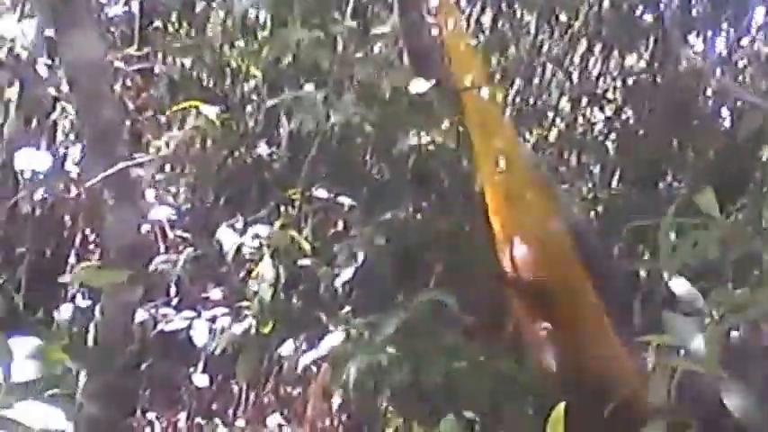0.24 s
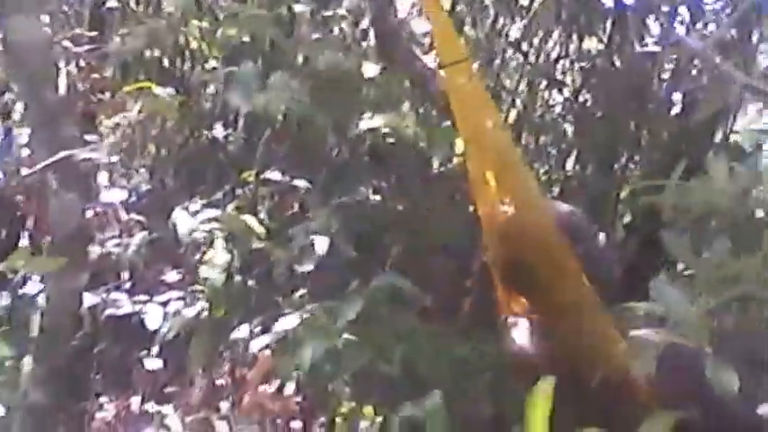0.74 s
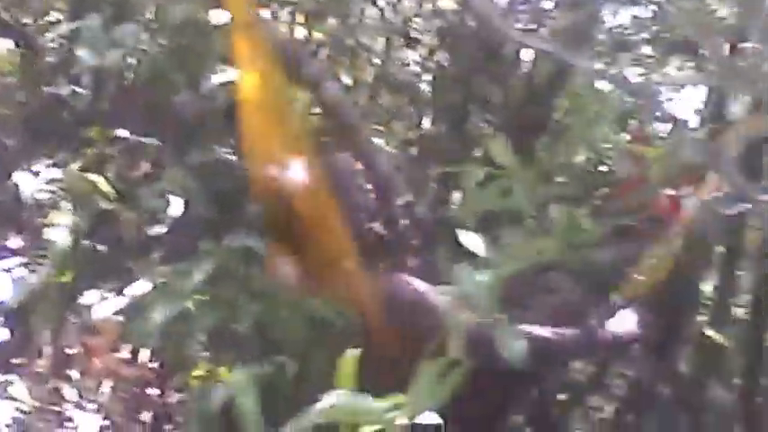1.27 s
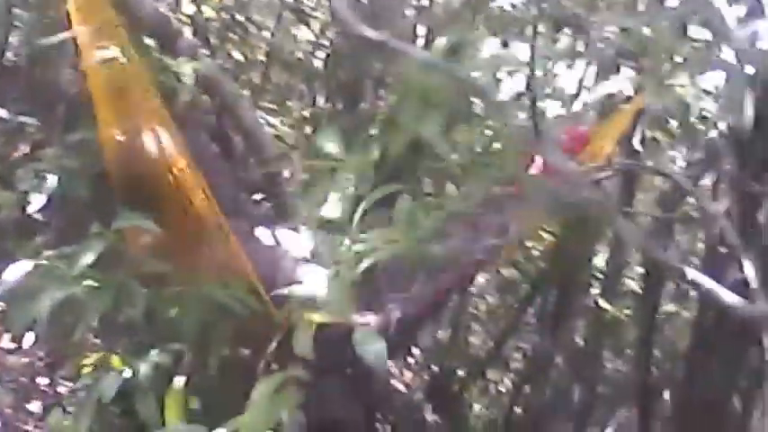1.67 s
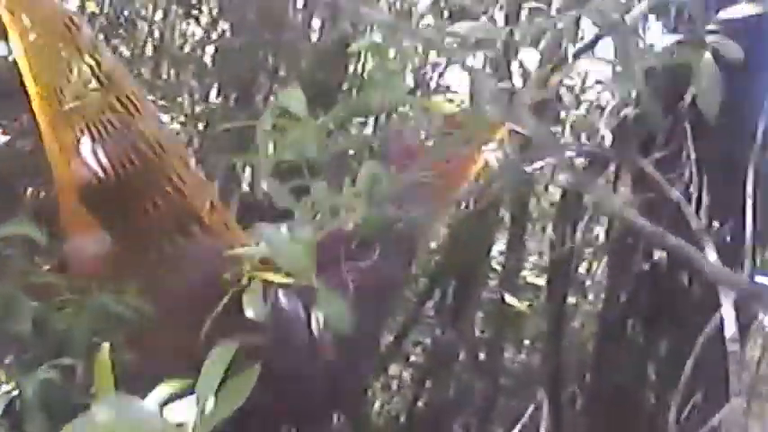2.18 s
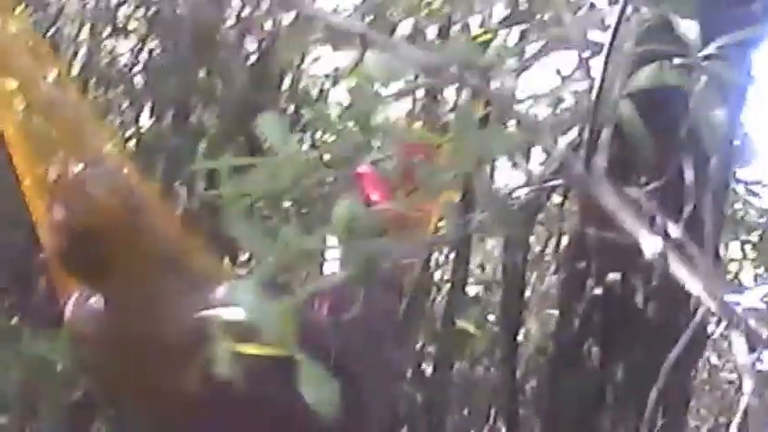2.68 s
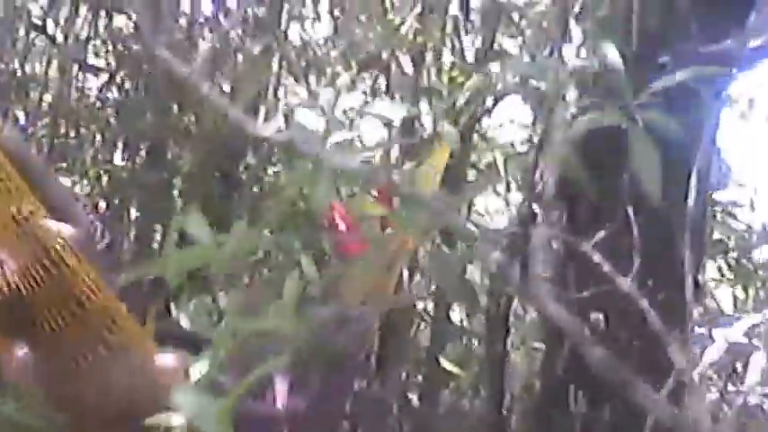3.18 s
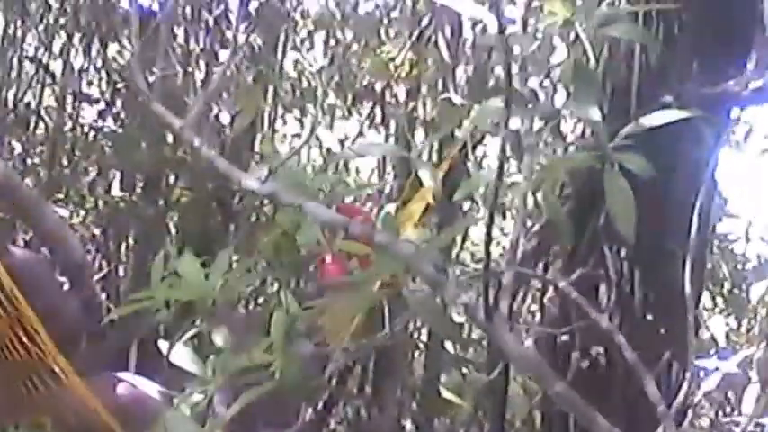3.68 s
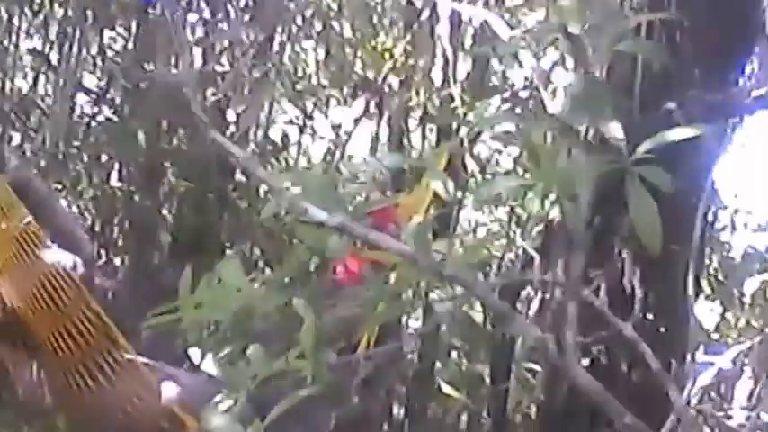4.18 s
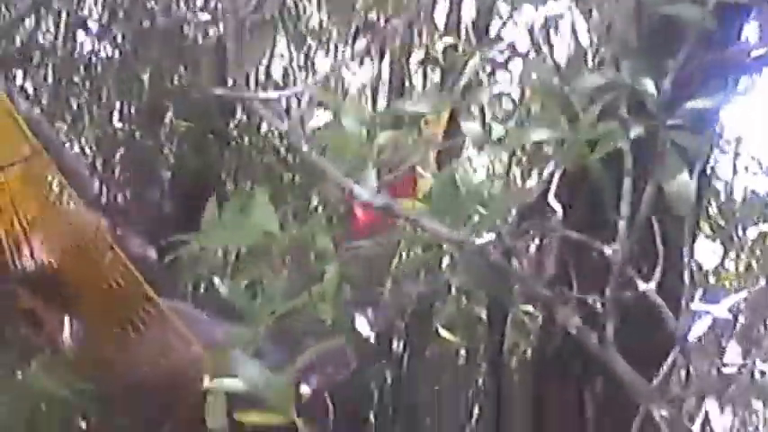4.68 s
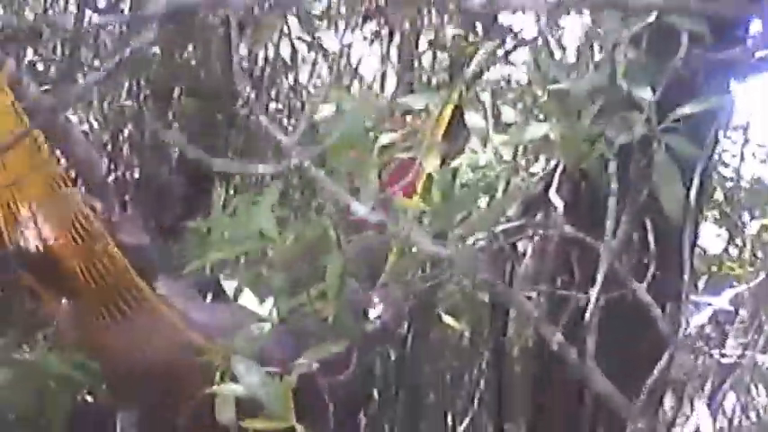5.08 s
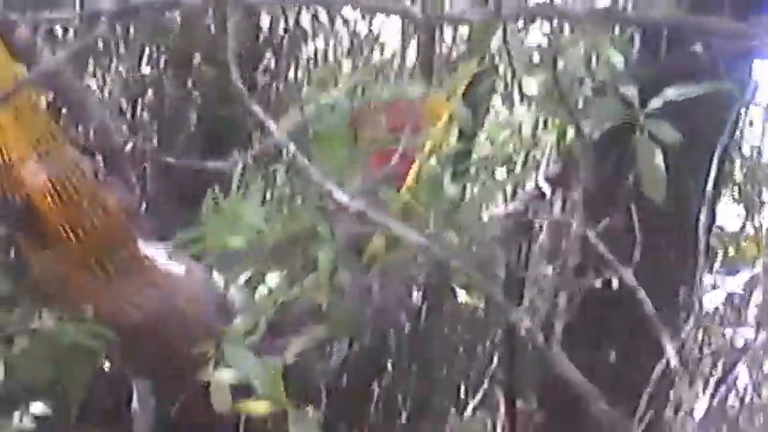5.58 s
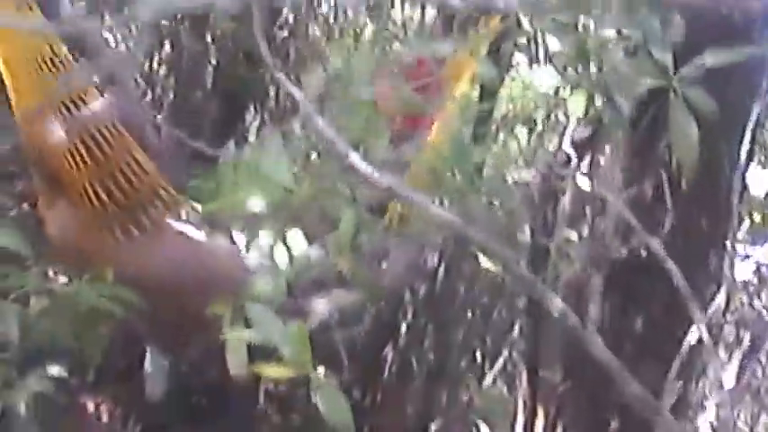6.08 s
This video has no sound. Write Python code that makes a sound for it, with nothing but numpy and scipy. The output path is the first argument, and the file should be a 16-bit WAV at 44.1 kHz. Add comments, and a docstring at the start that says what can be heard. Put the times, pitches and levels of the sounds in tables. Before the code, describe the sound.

A faint, steady forest hiss lies under close foliage sounds, heard through a small mono microphone. In the first second there are only light leaf brushes and tiny twig clicks. At about 1.2 seconds come a few soft low thuds and a small snap, then brief swishes. From 2 seconds a crisp rustle swells as an animal shifts in a net hammock and bends the boughs, dotted with twig ticks, easing around 3.4 seconds. At 3.8 seconds a branch cracks sharply with a burst of leaves, the loudest moment. Rustling continues in uneven waves over soft bumps and a low handling rumble. A scraping swish with a woody knock comes at 4.7 seconds, and a run of swishes and snaps peaks in another crack near 5.35. A quick double twig snap follows at about 6.1 seconds as the rustle thins.

```python
"""Leaves rustle and swish as an animal shifts in a net hammock slung in dense undergrowth.
Its weight bends the boughs, and countless leaf contacts merge into noise; stems scrape by stick-slip.
Twigs snap and one branch cracks sharply, each a brief force that excites damped resonances.
Soft thuds and a low rumble of handling run underneath, and the forest hisses faintly behind,
all heard through the small mono microphone of a camera close by."""
import sys
import numpy as np
from scipy import signal
from scipy.fft import rfft, irfft, next_fast_len
from scipy.io import wavfile

SR = 44100
rng = np.random.default_rng(int(sys.argv[2]) if len(sys.argv) > 2 else 0)


def waveform_to_disk(signal):
    """Save audio, clipped to [-1, 1], as 16-bit WAV at the path in sys.argv[1]."""
    frames = np.transpose(np.atleast_2d(signal))
    scaled = np.clip(frames, -1, 1) * 32767
    samples = np.round(scaled).astype(np.int16)
    wavfile.write(sys.argv[1], SR, samples)


N = 279594
T = np.arange(N) / SR

# soft bumps: start_s, peak_db, pitch_hz
BUMPS = [(1.162, -36, 77), (1.181, -37, 86), (1.239, -41, 78), (1.305, -52, 62), (1.528, -60, 190),
         (1.752, -66, 160), (2.521, -63, 65), (2.669, -59.5, 59.3), (3.201, -63, 69), (3.511, -59, 69.5),
         (3.603, -46.5, 91), (3.632, -44.5, 69), (3.709, -55.5, 58.7), (3.828, -47.5, 59.7),
         (4.151, -38, 111.6), (4.192, -49, 90), (4.392, -51, 76), (4.466, -56, 70), (4.513, -47, 102),
         (4.694, -47, 112), (4.719, -38.5, 118), (4.917, -44.5, 103), (4.934, -38.5, 136), (4.958, -41, 84),
         (5.067, -51, 79.6), (5.125, -49.5, 75), (5.26, -44, 69.6), (5.279, -41, 59.3), (5.362, -49.5, 93),
         (5.409, -51, 77), (5.49, -54, 64.3), (5.578, -51.5, 79), (5.879, -60, 44), (6.076, -57, 171)]
# spectrum of touching leaf edges: frequency_hz, density_db
EDGE_SPECTRUM = [(1500, -34.5), (2800, -22), (3800, -7.5), (4700, -3), (5250, -2.5), (5800, -3.5),
                 (6500, -4.5), (7000, -9), (7600, -15.5)]


def undb(db):
    """Amplitude ratio of a level in decibels."""
    return np.exp(np.log(10) * np.asarray(db) / 20)


def unit(x):
    """Normalisation to rms 1."""
    return x / np.sqrt(np.mean(x ** 2))


def colour(x, spectrum):
    """Spectral shaping by (frequency_hz, density_db) points, at rms 1."""
    hz, db = np.transpose(spectrum)
    size = next_fast_len(N + 4096)
    bin_hz = np.maximum(np.fft.rfftfreq(size, 1 / SR), 1)
    gain = undb(np.interp(np.log(bin_hz), np.log(hz), db))
    return unit(irfft(rfft(x, size) * gain, size)[:N])


def ring(x, hz, width_hz):
    """A damped resonator with gain 1 at its centre."""
    return signal.lfilter(*signal.iirpeak(hz, hz / min(width_hz, SR / 4), fs=SR), x)


def ring_twice(x, hz, width_hz):
    """Two equal resonators in cascade: a band with steeper skirts."""
    return ring(ring(x, hz, width_hz), hz, width_hz)


def add(out, start_s, x):
    """Superposition of a short signal from start_s on."""
    i = max(int(start_s * SR), 0)
    out[i:i + len(x)] += x[:N - i]


def crackle(per_s, spread_db):
    """Shot noise: contacts at random moments, many weak and a few strong."""
    chance, size, polarity = rng.random(N), rng.exponential(size=N), rng.choice([-1, 1], N)
    return unit((chance < per_s / SR) * polarity * undb(spread_db * np.minimum(size, 5)))


def wander(per_s):
    """Slow random modulation, interpolated between Gaussian values."""
    knots = rng.standard_normal(2048)
    return 1.6 * np.interp(T * per_s, np.arange(len(knots)), knots)


def swell(start_s, rise_s, hold_s, decay_s):
    """An envelope of linear rise, hold and exponential decay."""
    age = T - start_s
    return np.clip(age / rise_s, 0, 1) * np.exp(-np.clip((age - rise_s - hold_s) / decay_s, 0, 20))


def forest(level_db=-65.5):
    """Broadband noise of nearly constant level: the faint hiss of the forest."""
    # frequency_hz, density_db
    hiss_spectrum = [(25, -18), (170, -4.5), (500, -7), (1100, -5), (2000, -8.5), (3100, -8.5), (4400, 1.5),
                     (5800, 0.5), (7500, -4)]
    return undb(level_db + 0.26 * wander(16)) * colour(rng.standard_normal(N), hiss_spectrum)


def trunk_echo(x, t60_s=0.17, wet_db=-15):
    """Scattering from trunks and leaves adds a weak, short reverberation to the direct sound."""
    t = T[:SR // 2]
    echo = rng.standard_normal(len(t)) * undb(-60 * t / t60_s) * np.minimum(t / 0.0082, 1)
    return x + undb(wet_db) * signal.fftconvolve(x, echo / np.linalg.norm(echo))[:N]


def handling_rumble(sway_power, rest_db=-91, sway_db=-36.5, trail_db=-47, trail_db_per_db=0.33):
    """Structure-borne noise of handling: its power follows the sway and trails after every thud."""
    # frequency_hz, density_db
    rumble_spectrum = [(18, -22.5), (30, -5), (50, 7.5), (90, 1), (150, -6), (250, -19.5), (500, -43)]
    power = undb(rest_db) ** 2 + sway_power * undb(sway_db) ** 2
    trail = swell(0, rise_s=.025, hold_s=0, decay_s=0.05)[:SR]
    for start_s, peak_db, _ in BUMPS:
        add(power, start_s, (undb(trail_db + trail_db_per_db * peak_db) * trail) ** 2)
    uneven_db = 2.5 * wander(20)
    return np.sqrt(power) * undb(uneven_db) * colour(rng.standard_normal(N), rumble_spectrum)


def thuds(build_cycles=0.73, overtone_db=-23):
    """Heavily damped oscillation: a soft bump swings up and dies within a few cycles."""
    out, t = np.zeros(N), T[:8192]
    for start_s, peak_db, pitch_hz in BUMPS:
        age, phase = t * pitch_hz / build_cycles, 2 * np.pi * pitch_hz * t
        fade = np.exp(1 - age)
        swing = np.sin(phase) + undb(overtone_db) * fade * np.sin(2.5 * phase)
        add(out, start_s, undb(peak_db) * (age * fade) ** 2.8 * swing)
    return out


def branch_knocks(splinter_db=-22):
    """Modal response: a blow and a short run of splintering excite the resonances of the wood."""
    # knocks and cracks: start_s, level_db, centre_hz, width_hz, splinter_decay_s
    blows = [(1.167, -61, 167, 70, .008), (1.531, -58, 480, 620, 0.029), (3.8296, -38, 980, 1200, 0.019),
             (3.8287, -41.5, 267, 130, 0.0019), (4.154, -59.5, 160, 60, 0.0038),
             (4.3445, -55, 560, 1300, .0015), (4.376, -60, 830, 1500, 0.0015),
             (4.431, -58, 760, 1310, 0.0015), (4.69, -47.5, 990, 300, 0.0091),
             (4.689, -44, 1980, 500, 0.025), (5.128, -57, 800, 700, .008), (5.219, -47.5, 510, 680, 0.0035),
             (5.2189, -45, 1390, 893, 0.002), (5.35, -37, 1420, 1300, 0.011),
             (5.353, -41.5, 1676, 260, .028), (5.351, -53.5, 540, 330, 0.0049),
             (6.078, -55.5, 1500, 1900, .002), (6.0848, -55, 1150, 1500, 0.0097)]
    # branch resonances: pitch_hz, width_hz, gain_db
    modes = [(179, 76, 12), (250, 56, 5), (530, 230, 0.5), (714, 32, 1), (944, 110, -1), (1090, 190, 0.5),
             (1384, 110, 2), (1494, 38, -1.5), (1880, 280, 2), (1960, 380, -3), (2820, 900, 1.5)]
    out, t = np.zeros(N), T[:8192]
    for start_s, level_db, centre_hz, band_hz, decay_s in blows:
        splintering = undb(splinter_db) * rng.standard_normal(len(t)) * np.exp(-t / decay_s)
        # the hardness of the contact sets which resonances it reaches
        force = ring_twice((t == 0) + splintering, centre_hz, band_hz)
        wood = sum(undb(gain_db) * ring(force, hz, width_hz) for hz, width_hz, gain_db in modes)
        add(out, start_s, undb(level_db) * wood / np.std(wood[:512]))
    return out


def twig_snaps(rise_s=.0004):
    """Brittle fracture: a twig's fibres break within a few milliseconds and it rings briefly."""
    # breaking twigs: start_s, level_db, pitch_hz, width_hz, decay_s
    fractures = [(0.2618, -42, 4700, 900, 0.00051), (0.3136, -40, 5070, 800, 0.0009),
                 (0.394, -48, 5530, 2500, 0.00083), (0.538, -54, 4970, 3000, 0.00064),
                 (0.77, -51.5, 4500, 2400, 0.001), (1.1616, -38, 5830, 2000, 0.0026),
                 (2.1945, -39, 5000, 3000, .0005), (2.2036, -35.5, 5000, 3000, 0.0006),
                 (2.792, -32, 5200, 2500, 0.00082), (2.952, -29, 5220, 2200, 0.00052),
                 (3.229, -38.5, 5330, 2200, 0.0029), (3.8287, -13, 5370, 450, 0.00056),
                 (3.8285, -26.5, 3430, 600, .001), (3.833, -32, 3300, 700, 0.005),
                 (3.836, -22, 5030, 600, 0.00093), (4.0325, -33, 5300, 2500, .0005),
                 (4.3443, -38, 3600, 3000, .001), (4.376, -40, 3300, 2500, .0012),
                 (4.431, -45, 3000, 3000, .001), (4.7055, -25, 5170, 1600, 0.00087),
                 (4.9565, -38, 4800, 2600, .002), (5.218, -26, 4440, 2800, 0.0026),
                 (5.2513, -36, 4500, 2000, .002), (5.3505, -26, 4000, 3000, 0.003),
                 (5.378, -28, 4900, 2200, .003), (5.7363, -30.5, 5040, 1800, 0.0007),
                 (6.0776, -23.5, 5050, 1300, 0.0007), (6.0785, -33, 3500, 500, 0.0011),
                 (6.0846, -20, 5270, 1300, 0.00058), (6.0848, -25, 4440, 450, .0008),
                 (6.0847, -24.5, 3390, 400, 0.0008), (6.227, -36, 4970, 2200, 0.0029)]
    out, t = np.zeros(N), T[:2048]
    for start_s, level_db, pitch_hz, width_hz, decay_s in fractures:
        fibres = rng.choice([-1, 1], len(t)) * np.minimum(t / rise_s, 1) * np.exp(-t / decay_s)
        snap = ring_twice(fibres, pitch_hz, width_hz)
        # the energy equals that of level_db held for one decay time
        add(out, start_s, undb(level_db) * snap * np.sqrt(decay_s * SR) / np.linalg.norm(snap))
    return out


def stem_scrapes():
    """Stick-slip friction makes a stiff leaf or stem ring in one narrow band."""
    # sliding contacts: start_s, level_db, length_s, pitch_hz, width_hz
    slides = [(0.247, -44.5, 0.032, 4840, 1200), (0.278, -55, 0.053, 5000, 1000),
              (1.024, -62, 0.049, 5300, 950), (1.874, -68, .03, 600, 300), (1.936, -60.5, 0.034, 945, 700),
              (2.12, -73.5, .08, 400, 180), (2.14, -65.5, 0.093, 1330, 600), (2.433, -70, 0.046, 398, 170),
              (2.487, -47, 0.049, 3700, 950), (3.427, -62, 0.023, 2030, 350), (3.47, -74, 0.13, 338, 110),
              (4.018, -63, 0.06, 440, 170), (3.836, -31.5, 0.04, 5360, 1200),
              (4.693, -34.5, 0.044, 5180, 1300)]
    out, t = np.zeros(N), T[:8192]
    slips = crackle(per_s=3500, spread_db=1.2)
    for start_s, level_db, length_s, pitch_hz, width_hz in slides:
        grip = np.sqrt(np.maximum(1 - (2 * t / length_s - 1) ** 2, 0))
        friction = slips[int(start_s * SR):][:len(t)]
        add(out, start_s, undb(level_db) * grip * unit(ring_twice(friction, pitch_hz, width_hz)))
    return out


def bough_sway(rest_edge_db=-67, rest_rub_db=-79):
    """Loading and relaxation of the boughs set the sound power of leaf edges and of rubbing."""
    # boughs bending under the weight: start_s, edge_db, rise_s, hold_s, settle_s, relative_rub_db
    bends = [(1.775, -56.5, 0.14, 0.23, 0.21, -8.5), (2.1, -43.3, 0.34, .36, 0.19, -10.5),
             (2.95, -45, .17, 0.07, 0.09, -15), (3.263, -64.5, 0.043, 0.053, 0.15, 1),
             (3.716, -50.5, 0.18, 0.036, 0.088, -7.5), (3.811, -40, 0.028, 0.08, 0.28, -14.5),
             (4.03, -43, 0.22, 0.08, 0.25, -14), (4.62, -42, .11, 0.07, 0.073, -18),
             (4.834, -47.5, 0.047, 0.081, 0.11, -11.5), (5.01, -43.5, 0.064, 0.32, 0.15, -15),
             (5.572, -50, 0.035, 0.33, 0.06, -12)]
    edge_power, rub_power = undb(rest_edge_db) ** 2, undb(rest_rub_db) ** 2
    for start_s, edge_db, rise_s, hold_s, settle_s, relative_rub_db in bends:
        power = (undb(edge_db) * swell(start_s, rise_s, hold_s, settle_s)) ** 2
        edge_power += power
        rub_power += power * undb(relative_rub_db) ** 2
    return edge_power, rub_power


def leaf_ticks(per_s=300, spread_db=1.6, sizes=6):
    """Sparse impacts: dry tips flick past each other, each size of leaf resonating in its own band."""
    pitches_hz = np.geomspace(2800, 6600, sizes)
    ticks = sum(ring(crackle(per_s / sizes, spread_db), hz, hz / 4) for hz in pitches_hz)
    return colour(ticks, EDGE_SPECTRUM)


def leaf_contacts(spectrum, per_s, spread_db, ring_db, count, caught_s=.1):
    """Dense shot noise plus resonance: single leaves catch, ring at their own pitch and slip free."""
    contacts, scratching, ringing = crackle(per_s, spread_db), rng.standard_normal(N), np.zeros(N)
    caught = np.hanning(int(caught_s * SR))
    for when, smallness in rng.random((count, 2)):
        i = int(when * (N - len(caught)))
        pitch_hz = 280 + 6700 * smallness ** 1.4
        leaf = ring(scratching[i:i + len(caught)], pitch_hz, width_hz=14 + pitch_hz * .004)
        add(ringing, i / SR, caught * leaf)
    return unit(colour(contacts, spectrum) + undb(ring_db) * colour(ringing, spectrum))


def foliage(edge_power, rub_power):
    """Incoherent sources add in power: the rustle of swaying leaves and sprays that swish past."""
    # brushing sprays of leaves: start_s, level_db, rise_s, decay_s, relative_flex_db
    sprays = [(0, -56, 0.0056, 0.018, -10.5), (.08, -56, 0.015, 0.029, -33), (.155, -56, 0.017, 0.048, -19),
              (.215, -56, 0.02, 0.022, -14), (.385, -54, 0.0074, 0.026, -29),
              (1.153, -51, 0.0035, 0.028, -13.5), (1.526, -49.5, 0.016, 0.09, -20),
              (1.555, -44, 0.025, 0.036, -13.5), (1.694, -47, 0.028, 0.042, -10),
              (1.918, -54, 0.013, 0.028, -3), (2.05, -50, 0.025, 0.018, -26),
              (2.167, -44.5, 0.04, 0.026, -6.5), (2.62, -46, 0.06, .1, -18),
              (3.225, -36, 0.0078, 0.011, -20), (3.305, -48, 0.012, 0.044, -31),
              (3.624, -65.5, 0.0081, 0.067, 4), (3.83, -26, 0.0084, 0.035, -10.5),
              (4.688, -28, 0.012, 0.028, -15.5), (4.954, -36, 0.005, 0.07, -11.5),
              (5.13, -31.7, 0.027, 0.038, -9), (5.247, -38, 0.009, 0.036, -7.5),
              (5.35, -28.5, 0.0037, 0.036, -16), (5.612, -44, 0.022, 0.024, -15),
              (5.729, -35.5, 0.0072, 0.022, -17), (5.766, -39.5, 0.02, 0.075, -11.5),
              (6.068, -46.5, 0.0061, 0.059, -10.5), (6.16, -45, 0.008, 0.077, -14)]
    # rubbing leaves: frequency_hz, density_db
    rub_spectrum = [(150, -16), (300, -17), (450, -5.5), (750, -5), (1400, 1.5), (2200, 3.5), (3100, 5),
                    (4200, -2.5), (6000, -24)]
    # flexing blades: frequency_hz, density_db
    flex_spectrum = [(500, -26.5), (1100, -20.5), (1900, -7.5), (2500, -2.5), (3200, 0.5), (4200, -10),
                     (6000, -18.5)]
    flutter = undb(0.35 * wander(14))
    edge_power, flex_power = edge_power * flutter ** 2, 0
    ticking = np.sqrt(edge_power) * undb(-7) * leaf_ticks()
    for start_s, level_db, rise_s, decay_s, relative_flex_db in sprays:
        power = (undb(level_db) * swell(start_s, rise_s, 0, decay_s)) ** 2
        edge_power += power
        flex_power += power * undb(relative_flex_db) ** 2
    edges = leaf_contacts(EDGE_SPECTRUM, per_s=5000, spread_db=2.1, ring_db=-3, count=1700)
    rubbing = leaf_contacts(rub_spectrum, per_s=3000, spread_db=2.2, ring_db=3, count=1900)
    clumps = undb(.7 * wander(70))  # leaves rub together unevenly
    flexing = leaf_contacts(flex_spectrum, per_s=4000, spread_db=1.5, ring_db=1, count=1600)
    rustle = np.sqrt(edge_power) * edges + np.sqrt(rub_power) * flutter * rubbing
    return clumps * rustle + np.sqrt(flex_power) * flexing + ticking


def scene():
    """All sources superpose at one microphone, the same on both channels."""
    edge_power, rub_power = bough_sway()
    undergrowth = foliage(edge_power, rub_power) + stem_scrapes() + twig_snaps() + branch_knocks()
    mono = trunk_echo(undergrowth) + thuds() + handling_rumble(edge_power) + forest()
    return np.array([mono, mono])


def record(dry, gain_db=-0.6, soft_hz=6450, cut_hz=7400, sampling_hz=16000, image_db=-56, top_hz=15700):
    """Port resonance, a steep treble cut and a faint spectral image from the camera's slow sampling."""
    # resonances of the microphone port and housing: pitch_hz, width_hz, gain
    port_modes = [(1095, 70, .25), (1410, 150, .2), (1875, 110, .3), (2540, 90, .25), (3830, 110, .25),
                  (5250, 300, .36)]
    sensed = dry + sum(gain * ring(dry, hz, width_hz) for hz, width_hz, gain in port_modes)
    soft = signal.sosfilt(signal.butter(10, soft_hz, fs=SR, output="sos"), undb(gain_db) * sensed)
    cut = signal.sosfilt(signal.ellip(8, .3, 65, cut_hz, fs=SR, output="sos"), soft)
    image = undb(image_db) * 2 * np.cos(2 * np.pi * sampling_hz * T) * cut
    return signal.sosfilt(signal.ellip(8, .1, 65, top_hz, fs=SR, output="sos"), cut + image)


dry = scene()
out = record(dry)
waveform_to_disk(out)
```